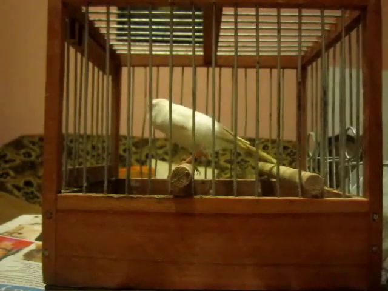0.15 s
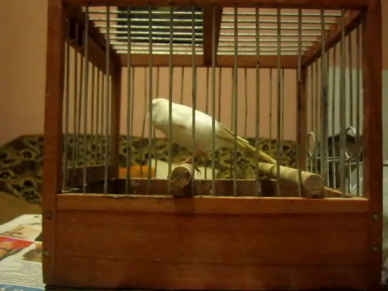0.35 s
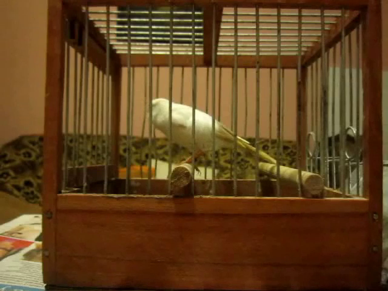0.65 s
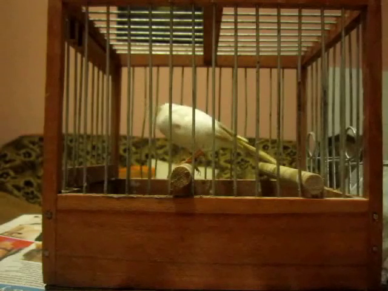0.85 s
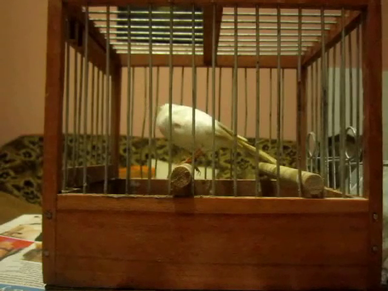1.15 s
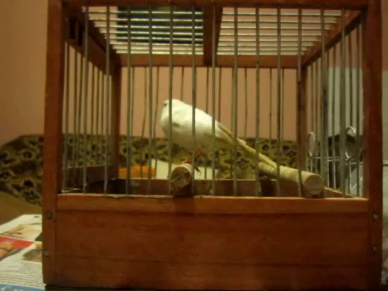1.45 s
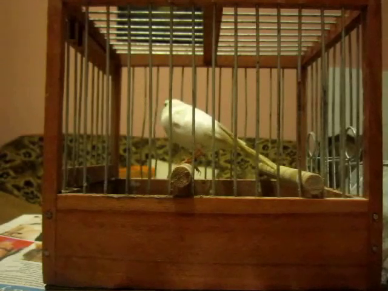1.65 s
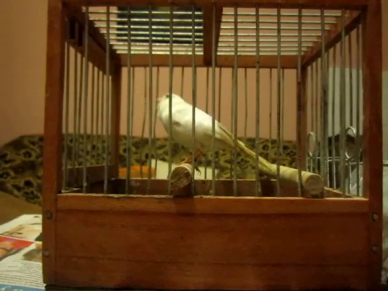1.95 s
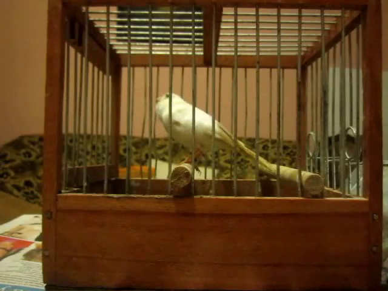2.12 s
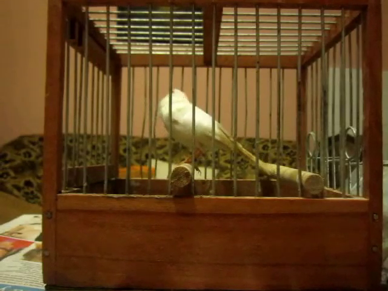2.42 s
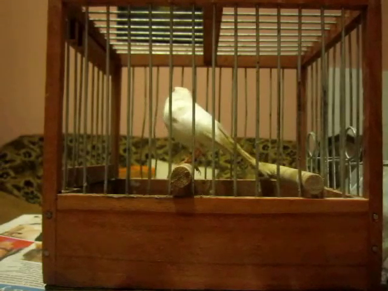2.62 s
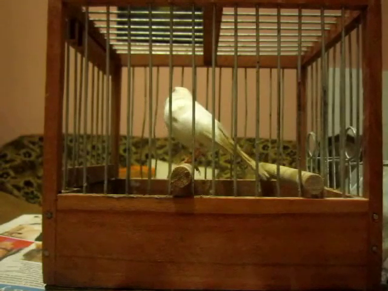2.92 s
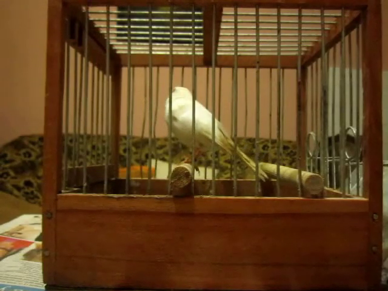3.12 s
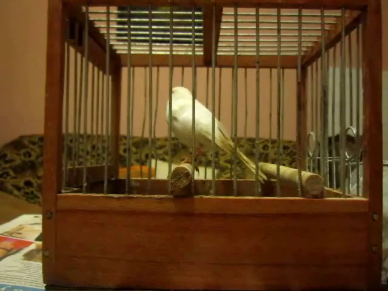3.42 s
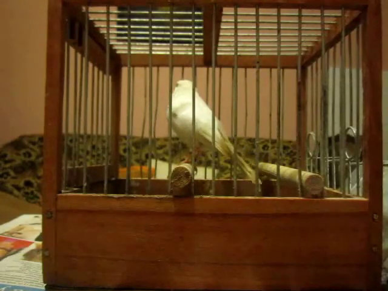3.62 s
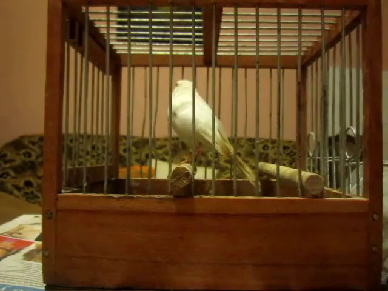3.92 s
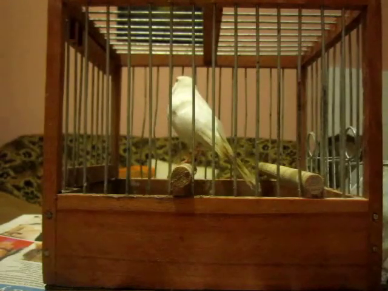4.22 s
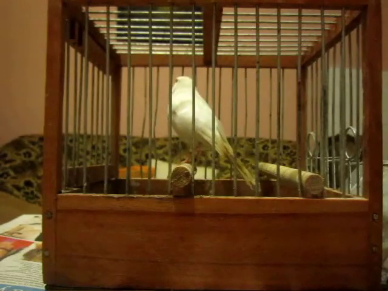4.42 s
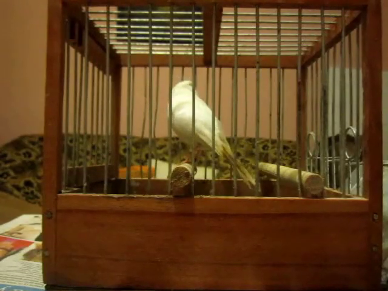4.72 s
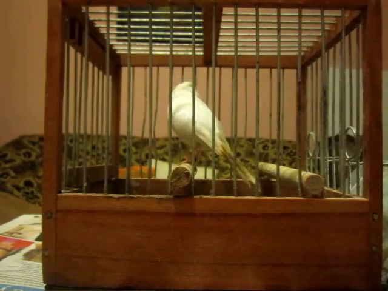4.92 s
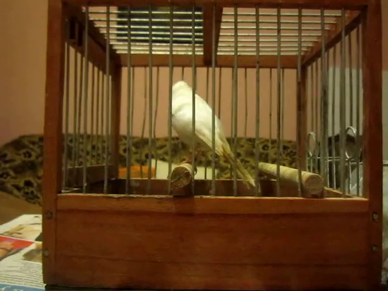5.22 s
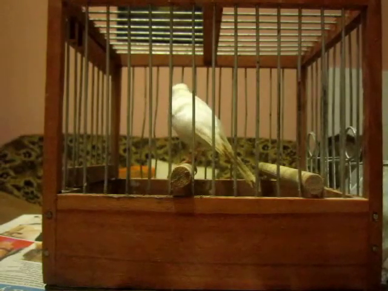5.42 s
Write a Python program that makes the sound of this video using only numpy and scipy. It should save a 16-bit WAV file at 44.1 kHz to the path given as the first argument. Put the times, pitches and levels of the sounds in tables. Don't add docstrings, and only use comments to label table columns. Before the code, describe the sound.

Indoors, a small songbird gives trills and harsh little rattles before a steady run of bright dipping chirps, with faint piping from another bird behind.

```python
import sys
import numpy as np
from scipy import signal
from scipy.fft import rfft, irfft, next_fast_len
from scipy.io import wavfile
from scipy.ndimage import map_coordinates

SR = 44100
rng = np.random.default_rng(int(sys.argv[2]) if len(sys.argv) > 2 else 0)


def dump_mix(stems):
    frames = np.atleast_2d(stems).T
    limited = np.clip(frames, -1, 1)
    pcm = np.round(limited * 32767).astype(np.int16)
    wavfile.write(sys.argv[1], SR, pcm)


def level_to_linear(level):
    exponent = np.asarray(level, float) / 20
    return 10 ** exponent


N = 244755

# accent in seconds, accent level in dB,
# pitch the accent dips to in Hz, climb start after the accent in seconds, crest in Hz.
SYLLABLES = [
    (2.783, -19.5, 2224, .09, 2960),
    (3.139, -17.5, 2322, 0.077, 2880),
    (3.509, -25, 1883, 0.088, 3080),
    (3.873, -17, 2070, .08, 2880),
    (4.233, -14.5, 2307, .075, 2980),
    (4.608, -15.5, 2286, .075, 3040),
    (4.98, -13.5, 1950, .09, 2900),
    (5.353, -16.5, 2373, 0.094, 2980),
]
# whistle level in dB, held low note level in dB, octave of the low note in dB,
# length after the accent in seconds, pitch ratio of the first half.
TAILS = [(-40.5, -43.5, -3.5, 0.19, 1.035), (-39, -43.5, -1.5, .225, 1.015), (-38.5, -44, -1, .21, 1.003),
         (-37.5, -43, -0.5, 0.19, .985), (-39.5, -41, -1.5, .22, .995), (-39, -42.5, -2.5, .222, .995),
         (-40, -39.5, -3.5, .226, 1.003), (-39, -41, -2.5, .22, 1.003)]


def unit(x):
    return x / np.sqrt(np.mean(np.abs(x) ** 2) + 1e-20)


def along(points, hz):
    f, v = np.transpose(points)
    return np.interp(np.log(hz + 1), np.log(f + 1), v)


def wobble(rate, size):
    knots = rng.standard_normal(int(size * rate / SR) + 4)
    return map_coordinates(knots, [np.arange(size) * rate / SR])


def filtered(x, response):
    m = next_fast_len(N + 8192)
    return irfft(rfft(x, m) * response(np.fft.rfftfreq(m, 1 / SR)), m)[:N]


def canary():
    upper, lower = rattles()
    high, _ = sing(whistles(upper), waver=0.04, flutter_db=0.8, rough_rate=190)
    low, _ = sing(held_notes(), waver=0.039, flutter_db=2.5, rough_rate=250)
    trill, _ = sing(pips(), waver=0.054, flutter_db=2.3, rough_rate=360)
    hoarse, hoarse_air = sing(hoarse_notes(lower) + catches(), waver=0.036, flutter_db=3.5, rough_rate=400)
    coupled = level_to_linear(9.5) * high * (low + hoarse)
    muffled = filtered((coupled + trill + hoarse).real, lambda hz: 1 / (1 + (hz / 4150) ** 20))
    breath = scrape(level_to_linear(6.0) * hoarse_air + level_to_linear(-9.5) * np.abs(high) ** 2, grain_db=4.5)
    return (high + low).real + muffled + breath


def sing(notes, waver, flutter_db, rough_rate):
    # Hz, level in dB.
    throat = [(2500, -3), (3300, -14), (4200, -21.5), (5000, -20.5), (6500, -46)]
    edge_s = 0.003
    out, air = np.zeros(N + SR, complex), np.zeros(N + SR)
    for rows in notes:
        rows = np.array(rows)
        start = max(round(rows[0, 0] * SR), 0)
        t = np.arange(start, round(rows[-1, 0] * SR) + 1) / SR
        size = len(t)
        span = slice(start, start + size)
        hz, db, octave_db, rough = (np.interp(t, rows[:, 0], column) for column in rows.T[1:])
        rough = np.clip(rough, 0, 1)
        phase = 2 * np.pi * np.cumsum(hz * (1 + waver * rough * wobble(55, size))) / SR
        edge = np.clip(np.minimum(t - t[0], t[-1] - t) / edge_s, 0, 1)
        air[span] += level_to_linear(db) * edge * rough
        third_db = octave_db + along(throat, 3 * hz)
        for harmonic, gain_db in enumerate([0, octave_db, third_db], 1):
            beating = (wobble(rough_rate, size) + 1j * wobble(rough_rate, size)) / np.sqrt(2)
            cycle = np.sqrt(1 - rough) + np.sqrt(rough) * beating
            level = level_to_linear(db + gain_db + flutter_db * wobble(70.3, size)) * edge
            out[span] += np.sqrt(2) * level * cycle * np.exp(1j * harmonic * phase)
    return out[:N], air[:N]


def struck(start, length, from_hz, to_hz, db):
    attack_s, start_db, sag_db = 0.008, -7.5, -4
    knee = min(attack_s / length, 0.5)
    return [(start, from_hz, db + start_db),
            (start + knee * length, from_hz + knee * (to_hz - from_hz), db),
            (start + length, to_hz, db + sag_db)]


def whistles(upper):
    # start in seconds, length in seconds, from Hz, to Hz, level in dB.
    single = [(0.0, 0.016, 3200, 3194, -38.5), (.172, 0.052, 2497, 2456, -34),
              (0.181, .035, 4930, 4780, -48), (3.497, .017, 1760, 1737, -23),
              (0.262, .042, 2450, 2490, -53), (1.377, 0.043, 2726, 2440, -45), (1.72, .04, 4043, 3780, -37),
              (1.729, 0.025, 3746, 3825, -38.5), (1.995, 0.047, 3968, 3906, -31.5),
              (2.022, 0.026, 3850, 3703, -32), (2.26, 0.015, 2870, 2630, -40),
              (2.301, 0.012, 3300, 3950, -37.5), (2.305, .045, 3920, 3993, -29.5),
              (2.33, .03, 3740, 3160, -37)]
    # Hz, level in dB.
    purity = [(3400, -3.5), (3900, -25), (4700, -34)]
    syllables_from_s, weak_db, weak_rough = 2.7, -33, 0.4

    def voiced(s, hz, db):
        octave_db = along(purity, 2 * hz) - 7 * (s < syllables_from_s)
        weak = db < weak_db and 2200 < hz < 3150 and s > syllables_from_s
        return s, hz, db, octave_db, 0.02 + weak_rough * weak

    glides = sweeps() + upper + [struck(*note) for note in single]
    return [[voiced(*row) for row in note] for note in glides]


def sweeps():
    # seconds from accent, pitch in Hz, share of the dip,
    # share of the way from whistle to accent level, added dB.
    accent = [
        (-.035, 2736, 0.011, 0, -9),
        (-.021, 2635, 0.046, .1, 1),
        (-.01, 2428, .12, 0.74, -1.5),
        (-.005, 2307, .45, 0.92, 2.5),
        (-.001, 2400, 1, 0.93, 3),
        (.004, 2430, .1, 0.9, 4),
        (.011, 2431, 0.018, .78, -1),
        (.017, 2423, 0.016, .38, -7.5),
        (.027, 2385, 0.0044, .1, 1),
    ]
    plateau_hz, last_hz, drop_hz = 2383, 2915, 2680
    climb_s, drop_s, crest_db, drop_db = 0.062, 0.016, -1, -9
    dip_loss_db_per_khz = 7
    notes = []
    for (s, top_db, dip_hz, climb, crest_hz), (db, _, _, length, ratio) in zip(SYLLABLES, TAILS):
        note = []
        for u, hz, dip, way, add_db in accent:
            loss_db = dip_loss_db_per_khz * dip * (hz - dip_hz) / 1e3
            pitch = hz * ratio + dip * (dip_hz - hz * ratio)
            note.append((s + u, pitch, db + way * (top_db - db) + add_db - loss_db))
        note += [(s + climb, plateau_hz * ratio, db),
                 (s + climb + climb_s, crest_hz, db + crest_db),
                 (s + length, last_hz, db + crest_db),
                 (s + length + drop_s, drop_hz, db + drop_db)]
        notes.append(note)
    return notes


def held_notes():
    # seconds from accent, pitch in Hz, added dB, added octave dB.
    hold = [
        (-.011, 1453, 6.5, 0),
        (.0, 1446, 3, -4),
        (.03, 1529, -2.5, 1),
        (.09, 1550, 2.5, -4),
        (.16, 1603, -1, 4.5),
        (.222, 1594, -3, 0),
        (.245, 1603, -14.5, -2),
    ]
    return [[(s + u, hz * (ratio if 0 < u < 0.12 else 1), db + add_db, octave_db + more_db, 0.24)
             for u, hz, add_db, more_db in hold]
            for (s, *_), (_, db, octave_db, _, ratio) in zip(SYLLABLES, TAILS)]


def pips():
    # time in seconds, peak in dB, pitch in Hz, octave in dB.
    puffs = [(0.3529, -20.5, 1456, -3), (0.3636, -34, 1400, 5), (0.373, -23.5, 1580, -32),
             (0.3817, -26, 1550, -3), (0.392, -40, 1590, 2), (0.4042, -26.5, 1550, -20),
             (0.4161, -29.5, 1610, -9), (0.427, -36.5, 1474, -5), (0.439, -39, 1540, -17.5)]
    rough = 0.12
    return [[(s - 0.0015, 1.024 * hz, db - 6.5, octave_db, rough),
             (s + 0.0035, hz, db - 6.5, octave_db, rough),
             (s + 0.0074, 1.03 * hz, db - 14.5, octave_db, rough)] for s, db, hz, octave_db in puffs]


def rattles():
    # start in seconds, voice break in seconds, end in seconds, level in dB, rasp against it in dB.
    calls = [
        (1.554, 1.613, 1.65, -37, 0),
        (1.83, 1.891, 1.93, -36, -1),
        (2.133, 2.189, 2.26, -36.5, 1),
        (2.435, 2.498, 2.6, -34.5, 2),
    ]
    voiced_sag_db = [-8, -2.5, 0.5, 1]
    # start in seconds, length in seconds, from Hz, to Hz, level in dB.
    croak = (.178, .06, 2450, 2350, -46)
    voice_hz, upper_hz, rasp_hz = 1344, 1797, 966
    upper_lead_s, upper_db = 0.042, -0.5
    voice_rough, rasp_rough, rasp_fade_db_per_s = 0.18, 0.62, -140
    stutter_s = 0.027
    burst = [(-0.1, 0.98, -2.5), (0.15, 1.0, -2), (0.5, 1.03, -4.5), (0.92, 1.06, -10.5)]  # (spacing share, pitch ratio, dB)
    upper, voiced, rasps = [], [], []
    for (start, broken, end, db, rasp_db), sag_db in zip(calls, voiced_sag_db):
        top_db = db + upper_db
        upper.append([(broken - upper_lead_s, upper_hz, top_db - 1.5),
                      (broken - 0.02, upper_hz, top_db),
                      (broken + 0.0023, 1.02 * upper_hz, top_db - 5.0)])
        voiced.append([(start, 1.02 * voice_hz, db - 4, voice_rough),
                       (start + 0.01, voice_hz, db, voice_rough),
                       (broken - 0.005, 1.01 * voice_hz, db + sag_db, 2.5 * voice_rough)])
        for s in broken + stutter_s * np.arange(4):
            if s < end - 0.012:
                level_db = db + rasp_db + rasp_fade_db_per_s * (s - broken)
                rasps.append([(s + u * stutter_s, ratio * rasp_hz, level_db + add_db, rasp_rough)
                              for u, ratio, add_db in burst])
    rasps.append([(*row, rasp_rough) for row in struck(*croak)])
    return upper, voiced + rasps


def hoarse_notes(lower):
    # start in seconds, length in seconds, from Hz, to Hz, level in dB.
    single = [
        (.003, 0.11, 1040, 1164, -53),
        (0.202, .026, 2150, 1940, -35),
        (0.219, .026, 1947, 1920, -33),
        (0.242, .03, 1924, 1890, -31),
        (0.279, 0.027, 1910, 1900, -37.5),
        (0.298, 0.018, 1730, 1620, -43),
        (.322, 0.031, 1692, 1610, -33),
        (2.122, 0.044, 1383, 1353, -40),
        (1.608, 0.049, 1366, 1430, -48),
        (1.92, 0.064, 1097, 1056, -37.5),
    ]
    # Hz, level in dB.
    octave = [(1900, -1), (2200, -7.5), (2700, -7), (3300, -5), (3850, -10.5), (4300, -20)]
    lower = lower + [[(*row, 0.14) for row in struck(*note)] for note in single]
    return [[(s, hz, db, along(octave, 2 * hz), rough) for s, hz, db, rough in note] for note in lower]


def catches():
    # time in seconds, peak in dB, pitch in Hz.
    catch = [
        (2.731, -33.5, 1100),
        (3.084, -30, 1166),
        (3.447, -29, 1110),
        (3.814, -30.5, 1110),
        (4.181, -31.5, 1157),
        (4.548, -32.5, 1133),
        (4.927, -31.5, 1077),
        (5.293, -28, 1162),
    ]
    return [[(s, 0.77 * hz, db - 13.5, -4, 0.6),
             (s + 0.015, hz, db - 13.5, -5, 0.25),
             (s + 0.042, 1.03 * hz, db - 20.5, -4, 0.3)] for s, db, hz in catch]


def scrape(air, grain_db):
    # Hz, level in dB per Hz.
    spectrum = [(500, -31.5), (900, -5.5), (1500, 1), (2200, 3), (3100, -0.5), (4000, -13.5), (5500, -44)]
    noise = filtered(rng.standard_normal(N), lambda hz: level_to_linear(along(spectrum, hz)))
    return air * unit(noise * level_to_linear(grain_db * np.tanh(wobble(170, N))))


def neighbour():
    # start in seconds, length in seconds, from Hz, to Hz, level in dB.
    far_notes = [(0.144, 0.2, 942, 941, -42), (0.543, 0.28, 894, 926, -44.5), (0.985, .25, 898, 950, -45.5),
                 (1.441, 0.23, 894, 951, -45), (1.649, .1, 925, 915, -52), (1.957, 0.27, 886, 958, -41.5),
                 (2.56, 0.15, 908, 908, -40.5), (2.941, 0.2, 904, 955.2, -44.5),
                 (4.134, .22, 940, 938, -43), (4.539, 0.26, 901, 925, -42.5), (4.99, 0.22, 893, 952, -47),
                 (5.439, 0.18, 882, 940, -46.5)]
    shape = [(0, -5), (0.2, -3), (0.62, 0), (0.9, -2.5), (1, -8)]  # (share of length, dB)
    pipes = [[(s + u * length, from_hz + u * (to_hz - from_hz), db + add_db, -40, 0.03) for u, add_db in shape]
             for s, length, from_hz, to_hz, db in far_notes]
    return sing(pipes, waver=0.09, flutter_db=2.9, rough_rate=60)[0].real


def room(x):
    # Hz, t60 in seconds.
    walls = [(800, 0.42), (2000, 0.29), (4000, 0.28), (7000, 0.12)]
    out, hop = np.zeros(N + 2 * SR), SR // 3
    fade = np.hanning(2 * hop + 1)[:-1]
    padded = np.pad(x, (hop, 2 * hop))
    for start in range(0, N + hop, hop):
        hz, t, z = signal.stft(rng.standard_normal(SR // 2), SR, nperseg=256)
        decay = level_to_linear(-60 * t / along(walls, hz)[:, None])
        tail = signal.istft(z * decay, SR, nperseg=256)[1]
        answer = signal.fftconvolve(padded[start:start + 2 * hop] * fade, tail / np.linalg.norm(tail))
        out[start:start + len(answer)] += answer
    return np.pad(out[hop:], (130, 0))[:N]


def resonant(modes):
    def ring(f):
        return sum(level_to_linear(db) * 1j * f * w / (c * c - f * f + 1j * f * w) for c, w, db in modes)
    return unit(filtered(rng.standard_normal(N), ring))


def background():
    # time in seconds, strength in dB.
    traffic = [
        (0.0, -53.5),
        (0.08, -49),
        (2.04, -43),
        (4.56, -47.5),
        (4.76, -52.5),
        (4.93, -48),
        (5.55, -50),
    ]
    # Hz, width in Hz, level in dB.
    drone_modes = [(150.7, 9.4, 7.5), (221.5, 44, -4.5), (261.5, 23, -6.5)]
    # Hz, width in Hz, level in dB.
    deep_modes = [(45, 30, -5.5), (83, 22, 4)]
    # Hz, level in dB per Hz.
    hiss_spectrum = [(20, 1), (300, -0.5), (500, -4.5), (1000, -5.5), (2500, -10.5), (4500, -11.5),
                     (6000, -17), (7200, -40.5)]
    deep_lag_s = 1
    s, db = np.transpose(traffic)
    mean_db = db.mean()
    t = np.arange(N) / SR
    swell_db = np.interp(t, s, db - mean_db)
    late_swell_db = np.interp(t - deep_lag_s, s, db - mean_db)
    drone_db = mean_db - 2 + 1.28 * swell_db + 0.57 * wobble(2.0, N)
    deep_db = mean_db - 7 + 0.8 * late_swell_db + 1.2 * wobble(1.4, N)
    drone = level_to_linear(drone_db) * resonant(drone_modes)
    deep = level_to_linear(deep_db) * resonant(deep_modes)
    hiss = level_to_linear(-46.5) * unit(filtered(rng.standard_normal(N), lambda hz: level_to_linear(along(hiss_spectrum, hz))))
    return drone + deep + hiss


def scene():
    near, far = canary(), neighbour()
    reflected = room(level_to_linear(-7.5) * near + level_to_linear(-12.5) * far)
    return (near + far + reflected + background())[None]


def roll_off(x):
    return signal.sosfilt(signal.butter(12, 7350, fs=SR, output="sos"), x)


def record(dry):
    top_hz = 7400
    mix = filtered(dry[0], lambda hz: hz < top_hz)[None]
    return roll_off(mix)


dry = scene()
out = record(dry)
dump_mix(out)
```